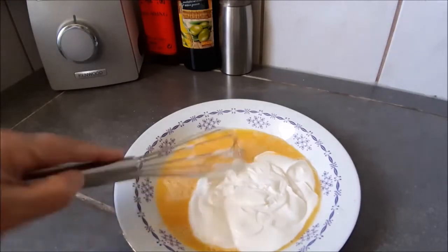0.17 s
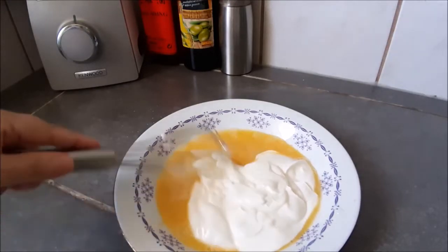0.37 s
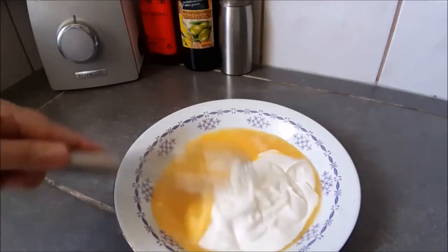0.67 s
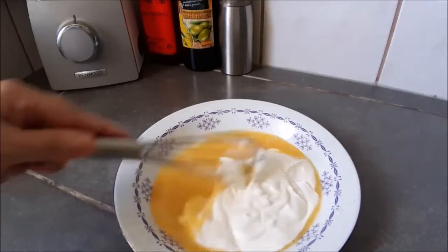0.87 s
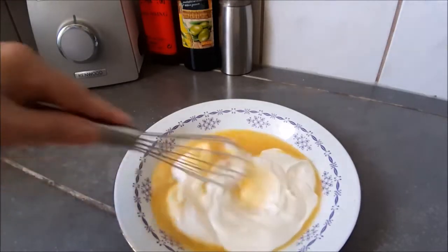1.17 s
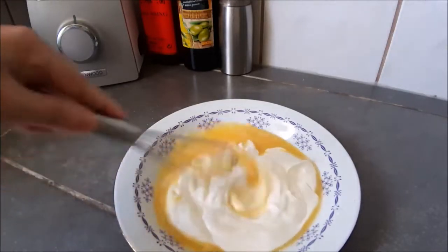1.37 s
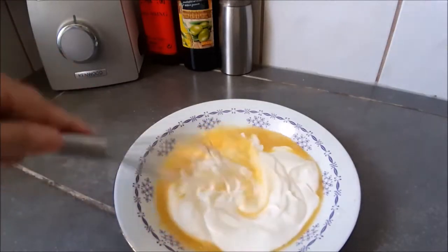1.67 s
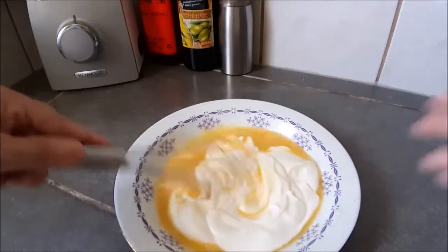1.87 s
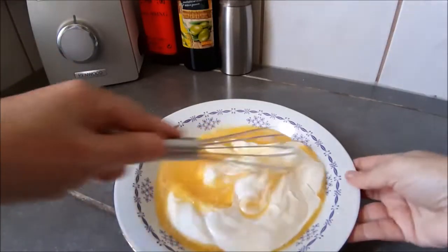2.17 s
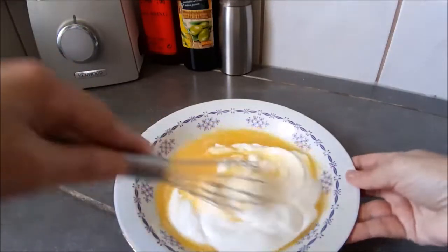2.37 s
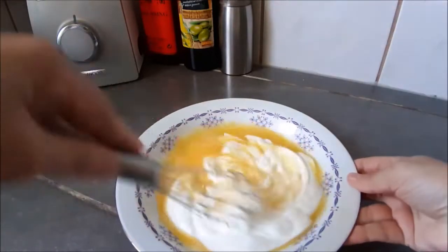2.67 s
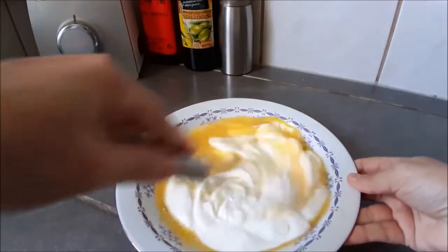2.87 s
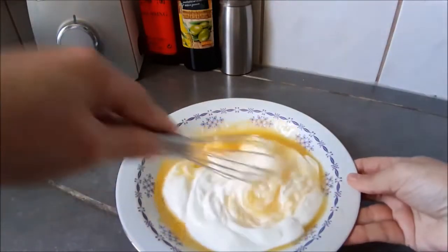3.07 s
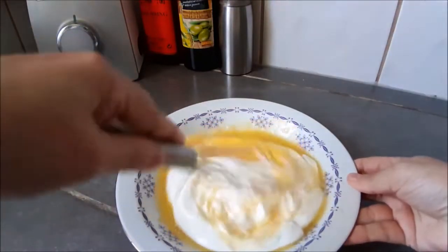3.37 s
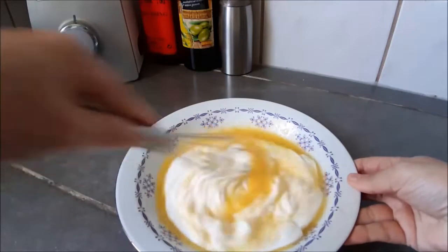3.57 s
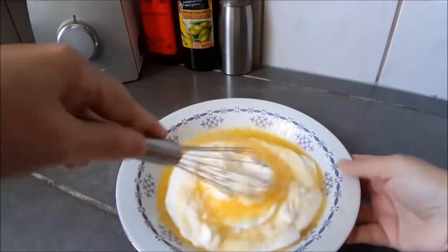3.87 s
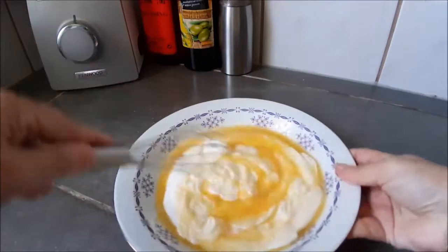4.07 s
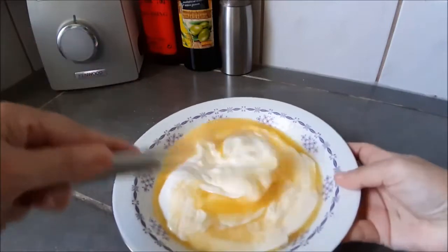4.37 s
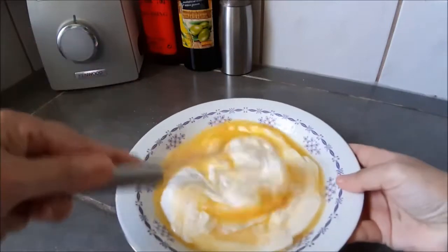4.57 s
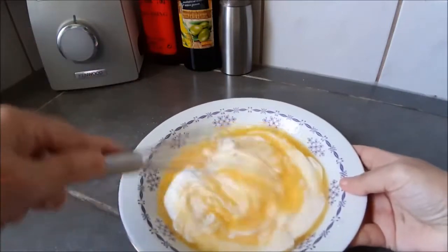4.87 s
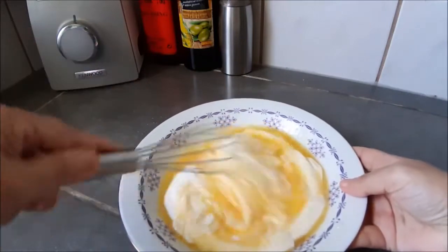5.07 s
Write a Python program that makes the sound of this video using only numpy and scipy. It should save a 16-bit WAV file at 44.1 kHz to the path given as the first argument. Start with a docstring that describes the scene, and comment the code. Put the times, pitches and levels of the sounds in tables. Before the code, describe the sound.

A wire whisk beats egg and yogurt in a ceramic dish, ringing clinks and light scrapes growing into harder, wetter strokes at the end.

```python
"""A steel balloon whisk beats egg and yogurt in a ceramic soup dish on a kitchen counter.
It opens in a quiet kitchen with faint touches; from 0.4 s hard blows ring the dish, each a noise burst
through its modes, then a drag. Wires scrape from 1.3 s and sing from 2.4 to 4 s, as filtered noise patches,
while the dish rubs on the counter and briefly hums. Wet slaps and the hardest blows crowd the last second.
A decaying noise echo of the small tiled room and a steady hush surround it all."""
import sys
import numpy as np
from scipy import signal
from scipy.fft import rfft, irfft, next_fast_len
from scipy.io import wavfile
from scipy.ndimage import uniform_filter1d, map_coordinates

SR = 44100
rng = np.random.default_rng(int(sys.argv[2]) if len(sys.argv) > 2 else 0)


def file_out(sig):
    """Save sig as 16-bit WAV at sys.argv[1]."""
    # one column per channel
    cols = np.atleast_2d(sig).T
    # limit, then scale
    lim = np.clip(cols, -1, 1)
    pcm = np.round(lim * 32767).astype(np.int16)
    wavfile.write(sys.argv[1], SR, pcm)


N = 230596


def amp(db):
    """Decibels to gain."""
    return 10 ** (np.asarray(db) / 20)


def unit(x):
    """Scale to rms 1."""
    return x / np.sqrt(np.mean(x ** 2) + 1e-20)


def along(points, hz):
    """Read a curve of (Hz, value) points on a log frequency axis."""
    f, v = np.transpose(points)
    return np.interp(np.log(hz + 1), np.log(f + 1), v)


def curves(tables):
    """A softened gate that is open inside the tables, then one curve for each column after the time."""
    t = np.arange(N) / SR
    s, *cols = np.vstack(tables).T
    gate = sum((t >= rows[0][0]) & (t <= rows[-1][0]) for rows in tables)
    return [uniform_filter1d(np.minimum(gate, 1.), size=600)] + [np.interp(t, s, c) for c in cols]


def wobble(rate):
    """A smooth random curve with `rate` knots a second."""
    knots = rng.standard_normal(int(N * rate / SR) + 4)
    return map_coordinates(knots, [np.arange(N) * rate / SR])


def stepped(spread_db, hold, length):
    """Random gains, each held for `hold` samples."""
    return amp(spread_db * rng.standard_normal(length // hold + 1).repeat(hold)[:length])


def filtered(x, response):
    """Shape x by a complex response of frequency, padded against wrap-around."""
    n = x.shape[-1]
    m = next_fast_len(n + 4096)
    return irfft(rfft(x, m) * response(np.fft.rfftfreq(m, 1 / SR)), m)[..., :n]


def modes(table, gains=1, shift=0):
    """Causal resonances of alternating sign; gains may differ by mode and microphone, pitches may scatter."""
    centre, width, db = np.transpose(table)[:, :, None]
    centre = centre * (1 + shift * rng.standard_normal(centre.shape))
    sizes = gains * (-1.) ** np.arange(len(table))
    return lambda f: sizes @ (amp(db) * 1j * f * width / (centre * centre - f * f + 1j * f * width))


def rough(level_db):
    """Noise whose strength follows a jumpy level, as many small contacts."""
    return unit(amp(level_db) * rng.standard_normal(N))


# wire blows: start_s [s], level_db [dB], spot_hz favoured pitch [Hz], lift_db its lift [dB],
# higher_hz second favoured pitch [Hz], low_db low dish modes [dB], drag_db [dB], drag_s [s]
WHISK_BLOWS = [(0.173, -64.5, 2290, -4, 7600, -4, -0.5, .04), (0.261, -41.5, 1193, 2.5, 2035, 12, 2, 0.052),
               (0.2712, -39, 2100, 0, 4700, 2, -15, 0.11), (0.401, -47, 1436, 20, 2600, -18, -17, 0.063),
               (0.427, -28, 1400, 7, 5850, 6.5, -18.5, 0.072), (0.6149, -27, 1164, 9, 2120, 4, -17, 0.064),
               (0.789, -51, 1270, 14, 2160, 5, -4.5, 0.097), (0.8064, -23.5, 1186, 11, 2127, 5, -35, 0.043),
               (1.0898, -25.5, 900, 7, 2976, 0.5, -18.5, 0.082),
               (1.281, -41.5, 2197, 11, 1383, 4, -5.5, 0.06),
               (1.4291, -37.5, 1570, 11, 2660, -2, -31, 0.048),
               (1.505, -50.5, 1580, 14.5, 2230, -4, 5, 0.045),
               (1.5296, -43, 1630, 22, 2620, 7.5, -14, 0.019),
               (1.72, -28, 2330, 2.5, 4580, -3.5, -12.5, 0.034),
               (1.873, -40, 1850, 5, 4260, -4, -23, 0.029),
               (1.8897, -35.5, 1174, 19, 1740, -16, -13, 0.095),
               (1.9026, -31.5, 792, 14, 1880, 13, -38, 0.22),
               (1.9903, -42.5, 2800, 10, 4470, -21, -31, 0.19),
               (2.1269, -30, 2690, 15.5, 2160, 4, -18, 0.06), (2.197, -44, 1800, 5, 2490, 8, -20.5, 0.083),
               (2.3443, -45.5, 800, 28, 2860, -13.5, -9, 0.046),
               (2.486, -48.5, 1500, 13, 2160, -4, -33, 0.017), (2.698, -53.5, 1410, 13, 2600, 8, -11, 0.04),
               (2.861, -60, 1324, 5, 3040, -4, -35, .03), (2.897, -41, 1554, 19, 2637, -9, 2.5, 0.016),
               (3.005, -44.5, 1580, -11, 4230, -32, -42, 0.035),
               (3.2396, -27, 1602, 29, 4100, -5.5, -33, 0.016),
               (3.314, -40, 1430, 7, 3840, -20, -11.5, 0.03), (3.3435, -44, 1325, 7, 3900, 0.5, -2, 0.023),
               (3.533, -46, 1534, 25.5, 4050, 6.5, -11, 0.073),
               (3.564, -45.5, 1560, 25.5, 2450, -11, -26.5, 0.023),
               (3.5809, -39.5, 1424, 9, 4150, -4, -10.5, 0.039),
               (3.723, -44.5, 1590, 4, 2390, -11, -9, 0.036), (3.8, -43, 1510, 20.5, 2600, 9.5, -24, 0.062),
               (3.829, -46.5, 1345, 11, 2580, 4, -7, .02), (3.849, -45, 824, 14.5, 4060, 4, 3.5, 0.014),
               (3.928, -44.5, 1270, -2, 2320, -10, -31, .02),
               (4.1206, -27.5, 787, 15.5, 4375, 6, -19.5, 0.051),
               (4.3244, -28.5, 2490, 19.5, 3220, 7.5, -19.5, 0.043),
               (4.414, -49, 1145, 0, 7800, -4, -18, 0.1), (4.4968, -48, 2340, -6, 6250, -23, -9.5, 0.045),
               (4.5263, -19.5, 2700, 4, 4600, 0, -23.5, 0.074),
               (4.7077, -38, 780, 2, 7640, 12.5, -3.5, 0.0074),
               (4.7358, -18.5, 850, 13.5, 3273, -2.5, -33, 0.076),
               (4.7788, -32, 1820, 5.5, 2800, -30, -33.5, 0.15),
               (4.9209, -28, 1750, 13.5, 2250, 6.5, -47, .046),
               (4.947, -25, 1792, 9.5, 1560, 7, -17.5, 0.073),
               (5.147, -27.5, 845, 18.5, 1810, 11.5, -55, 0.018),
               (5.1686, -25, 1600, 16.5, 2560, 10, -18, 0.059)]
# ceramic dish resonances: centre_hz [Hz], width_hz [Hz], level_db [dB]
DISH_MODES = [(800.5, 50, -9), (901, 35, -1.5), (1183, 32, -1.5), (1389, 34, 1), (1592, 33.4, -2.5),
              (1774, 64, 2.5), (2139, 41.5, 0.5), (2305, 51, 1.5), (2637, 120, -3.5), (3190, 67, 3),
              (4076, 340, -7.5), (4603, 53, 2), (5037, 300, -9), (5960, 140, -2.5), (7676, 335, -12.5)]
# counter resonances: centre_hz [Hz], width_hz [Hz], level_db [dB]
COUNTER_MODES = [(258.6, 23, -3), (327.5, 14.6, 3.5), (395, 47, -4), (451, 56, -5), (755, 123, 1.5),
                 (1200, 197, -2.5), (1900, 940, -14.5)]
# the cupboard under the counter: centre_hz [Hz], width_hz [Hz], level_db [dB]
CUPBOARD_MODES = [(108, 28.5, -2.5), (143, 6.9, -5)]
# colour of the wires' own click: freq_hz [Hz], level_db [dB]
WIRE_CLICK = [(290, -20), (500, -20), (885, -12.5), (1430, -8), (3210, 0), (3710, -5.5), (12300, -12.5),
              (15600, -12.5), (16500, -61)]
# modes that a blow near the rim wakes or misses: centre_hz [Hz], lift_db [dB]
RIM_LIFTS = [(790, -6), (1650, -7), (2620, -5), (3150, 5), (4100, -9), (5100, 5)]
RIM_HZ = 1150, 1240  # a blow that favours a pitch in this range fell near the rim
DISH_DB, WIRE_DB, KNOCK_DB = 1, -3, -5  # shares of dish, wires and counter in a blow of MIDDLE_DB
MIDDLE_DB, TREBLE_DB = -25.5, 4.5  # a middling blow's level and its treble lift
BRIGHTER, KNOCK_GROWS, CLEAN_GROWS = 0.12, 0.14, 0.13  # dB of treble, knock, first strike per dB of strength
HIGHER_DB, BESIDE = 8, 0.06  # lift of the higher pitch; spill of lifts to neighbours (log-frequency width)
DAMPED, DRAG_SHARE = 1.13, 0.97  # widening of a loaded mode; share of the lifts left in the drag
ECHO_SHARE = 0.4  # share of the lifts that the room does not hear: they belong to the near side of the dish


def spill(ratio):
    """A lift is full at its own pitch and fades at neighbouring ones."""
    return np.exp(-(np.log(ratio) / BESIDE) ** 2)


def loaded_dish(pitches_hz):
    """The load of the mixture pulls the nearest mode to each favoured pitch and widens it."""
    loaded = np.array(DISH_MODES, float)
    for hz in pitches_hz:
        k = np.argmin(abs(np.log(loaded[:, 0] / hz)))
        loaded[k, :2] = hz, DISH_MODES[k][1] * DAMPED
    return loaded


def strike_force(stronger_db, drag_db, drag_s):
    """Wires land within a few ms, then drag: noise of shape (landing or drag, microphone, sample)."""
    t = np.arange(SR // 7) / SR
    landing = (1 - np.exp(-t / 0.0012)) * np.exp(-(t / 0.0076) ** 1.35)
    dragging = 1 / (1 + np.exp(np.clip((t - drag_s) / 0.01, -30, 30)))
    envelopes = np.array([landing, amp(drag_db) * dragging])[:, None]
    force = envelopes * rng.standard_normal((2, len(t))) * stepped(1.25, 40, len(t))
    force[0, :, 25] += 3 * amp(CLEAN_GROWS * stronger_db)  # the first wire strikes cleanly
    # the two sides of the dish face different microphones
    force[:, 1] = 0.058 * force[:, 0] + 1.065 * force[:, 1]
    return force


def blow(db, spot_hz, lift_db, higher_hz, low_db, drag_db, drag_s):
    """One strike rings dish, wires and counter; the struck spot favours some dish modes."""
    stronger_db = db - MIDDLE_DB
    force = strike_force(stronger_db, drag_db, drag_s)
    loaded = loaded_dish((spot_hz, higher_hz))
    centre = loaded[:, 0]
    favour_db = lift_db * spill(centre / spot_hz) + HIGHER_DB * spill(centre / higher_hz)
    near_rim = RIM_HZ[0] < spot_hz < RIM_HZ[1]
    treble_db = TREBLE_DB + BRIGHTER * stronger_db

    def tilt(f):
        rim_db = near_rim * sum(lift * spill((f + 1) / hz) for hz, lift in RIM_LIFTS)
        slope_db = np.interp(np.log(f + 1), np.log([1160, 1470, 4400, 6550]), [low_db, 0, 0, treble_db])
        return amp(rim_db + slope_db)

    ring = 0
    for part, share in zip(force, (1, DRAG_SHARE)):
        chance_db = 1.5 * rng.standard_normal(len(centre)) + 2 * rng.standard_normal((2, len(centre)))
        dish = modes(loaded, amp(share * favour_db + chance_db), shift=0.004)
        ring = ring + filtered(
            part, lambda f: tilt(f) * (amp(DISH_DB) * dish(f) + amp(along(WIRE_CLICK, f) + WIRE_DB)))
    below = COUNTER_MODES + CUPBOARD_MODES
    knock = filtered(force[:, 0].sum(axis=0), modes(below, amp(2.5 * rng.standard_normal(len(below)))))
    return amp(db) * (ring + amp(KNOCK_DB + KNOCK_GROWS * stronger_db) * knock)


def blows():
    """Place every blow close by, and its less coloured echo in the room."""
    near, far = np.zeros((2, N + SR)), np.zeros((2, N + SR))
    for start_s, *settings in WHISK_BLOWS:
        _, spot_hz, lift_db, higher_hz, *_ = settings
        sound = blow(*settings)
        start = round(start_s * SR)
        near[:, start:][:, :sound.shape[1]] += sound

        def unlift(f):
            lifts_db = lift_db * spill((f + 1) / spot_hz) + HIGHER_DB * spill((f + 1) / higher_hz)
            return amp(-ECHO_SHARE * lifts_db)

        echo = kitchen(filtered(sound, unlift))
        far[:, start:][:, :echo.shape[1]] += echo
    return near[:, :N], far[:, :N]


# wires sliding round the glaze, one list per passage: time_s [s], rustle_db [dB],
# low_hz pitch of the singing mode [Hz], low_db its level [dB], high_db level of the mode above [dB]
WIRE_SLIDES = [
    [(1.29, -60, 1350, -91, -78), (1.368, -67, 1600, -69, -86), (1.458, -62, 1634, -67, -76),
     (1.564, -66, 1670, -65, -63), (1.628, -85, 1630, -76.5, -100), (1.7, -57.5, 1290, -76, -90)],
    [(2.4, -64.5, 1540, -80, -77), (2.592, -70, 1473, -65, -57), (2.676, -66, 1590, -60, -96),
     (2.758, -64, 1400, -74, -80), (2.84, -60, 1330, -54.5, -65.5), (2.898, -62, 1590, -64, -69),
     (2.952, -62.5, 1540, -55, -85), (3.016, -62, 1610, -61, -78), (3.156, -59.5, 1286, -59, -57),
     (3.222, -58, 1633, -58, -83), (3.268, -73, 1593, -48, -92), (3.444, -55.5, 1292, -58.5, -77),
     (3.548, -72, 1564, -67, -69), (3.588, -81, 1470, -62, -56), (3.688, -52.5, 1230, -64.5, -67),
     (3.75, -55, 1530, -56, -65), (3.782, -78, 1530, -75.5, -76), (3.868, -72, 1446, -56, -55.5),
     (3.89, -61, 1470, -71, -77), (3.932, -72.5, 1264, -58.5, -82), (4.0, -99, 1320, -97, -100)],
]
# colour of the sliding hiss: freq_hz [Hz], level_db [dB]
SLIDING_HISS = [(400, -77), (482, -10.5), (1170, -11.5), (1570, -2.5), (2020, -7), (2430, -3),
                (11000, -13.5), (15300, -19), (16500, -39)]
# path of the mode above: time_s [s], pitch_hz [Hz]
UPPER_PATH = [(1.45, 2550), (2.42, 2274), (2.62, 2140), (2.8, 2554), (4.0, 2420)]
# modes woken at the low and at the high spot: centre_hz [Hz], width_hz [Hz], level_db [dB]
SPOT_MODES = [
    [(2257, 66, 3.5), (3426, 55, 9.5), (4630, 56, 2.5), (6060, 53, 0)],
    [(2670, 43, 2), (3370, 91, -3), (4170, 75, 5), (5760, 110, 1)],
]
RUB_S, UPPER_SPREAD = 0.04, 0.025  # spacing of the spots (s); relative pitch scatter of the mode above
SPOT_HZ, TOP_HZ = 1460, 16700  # singing pitch that divides the two spots; upper band limit


def rubs():
    """Stick-slip: spot after spot the wires rustle through the dish and make two loaded modes sing."""
    gate, rustle_db, low_hz, low_db, high_db = curves(WIRE_SLIDES)
    step = round(RUB_S * SR)
    out = np.zeros((3, 2, N + SR))  # rustle, low song, high song
    fade = np.sin(np.pi * np.arange(2 * step) / (2 * step))
    upper_dish = DISH_MODES[7:]
    for i in range(0, N - step, step):
        if gate[i:i + 2 * step].max() < .01:
            continue
        # many short slips
        slips = stepped(3.5, 60, 2 * step) * rng.standard_normal((2, 2 * step))
        dish = modes(upper_dish, amp(-3 + 6 * rng.standard_normal(len(upper_dish))), shift=.04)
        pitch_hz = low_hz[i + step]
        woken = SPOT_MODES[int(pitch_hz > SPOT_HZ)]
        fleck = modes(woken, amp(5 + 4 * rng.standard_normal(len(woken))), shift=.015)
        upper_hz = np.interp((i + step) / SR, *np.transpose(UPPER_PATH))
        upper_hz *= 1 + UPPER_SPREAD * rng.standard_normal()
        patches_db = 3 * rng.standard_normal(24)  # each spot has its own uneven colour
        colour = lambda f: amp(np.interp(f, np.linspace(0, TOP_HZ, len(patches_db)), patches_db))
        surface = lambda f: colour(f) * (amp(along(SLIDING_HISS, f) + 6.0) + dish(f)) + fleck(f)
        rustle = unit(filtered(slips, surface))
        # a mode sings at some spots and breaks off at others
        sing_db = -7 * abs(rng.standard_normal((2, 1, 1))) + 3
        # a pitch mirrored about the dividing one sounds faintly along
        low_pair = modes([(pitch_hz, 90, 0), (2 * SPOT_HZ - pitch_hz, 110, -5)], shift=.015)
        high_mode = modes([(upper_hz, 130, 0)])
        low = unit(filtered(slips, lambda f: low_pair(f) ** 2))
        high = unit(filtered(slips, lambda f: high_mode(f) ** 2))
        out[..., i:i + 2 * step] += fade * np.array([rustle, *(amp(sing_db) * [low, high])])
    rustle, low, high = out[..., :N]
    flutter = amp(3.5 * wobble(35) + 3 * wobble(140))
    low_song = amp(low_db + 0.93 * wobble(45)) * low
    high_song = amp(high_db + 1.3 * wobble(25.1)) * high
    return gate * (amp(rustle_db) * flutter * rustle + low_song + high_song)


# the dish shifting on the counter: peak_s [s], rub_db [dB], rise_s and fall_s for 20 dB [s, at least 0.01],
# upper_db level of the upper part [dB]
DISH_SHIFTS = [(0.202, -76, 0.2, 0.5, -28), (1.928, -61, 0.038, -0.325, 3.5),
               (2.278, -65.5, 0.11, 0.06, -3.5), (2.644, -60.5, 0.17, 0.19, 1),
               (3.265, -72, 0.17, 0.94, 0.5), (2.855, -64, 0.034, 0.09, -2),
               (4.058, -58, 0.013, -0.06, -9.5), (4.293, -53.5, 0.17, 0.0353, 3.5),
               (4.661, -57, 0.16, 0.1, 1)]
# the cupboard shaken through the counter: time_s [s], level_db [dB]
CUPBOARD_SHAKE = [
    [(0.0, -85), (0.12, -79), (0.185, -56.5), (0.26, -74.5), (0.42, -74.5), (1.66, -89.5), (1.73, -70.5),
     (1.8, -82), (3.7, -78.5), (4.74, -70.5), (4.89, -81), (5.01, -59), (5.07, -72), (5.23, -99)],
]
ROUND = 1.17  # how round the top of a swell is


def rocking():
    """The foot of the dish judders on the counter and shakes the cupboard below."""
    t = np.arange(N) / SR
    lower, upper = np.zeros(N), np.zeros(N)
    for peak_s, db, rise_s, fall_s, upper_db in DISH_SHIFTS:
        distance = np.where(t < peak_s, (peak_s - t) / max(rise_s, .01), (t - peak_s) / max(fall_s, .01))
        swell_db = -20 * distance ** ROUND
        lower += amp(db + swell_db)
        upper += amp(db + upper_db + swell_db)
    judder = rough(2.8 * wobble(35) + 1.8 * wobble(110))
    low_rub = lower * unit(filtered(judder, modes(COUNTER_MODES[:4])))
    high_rub = upper * unit(filtered(judder, modes(COUNTER_MODES[4:])))
    boom = filtered(rough(4.7 * wobble(45)), modes(CUPBOARD_MODES))
    return low_rub + high_rub + amp(curves(CUPBOARD_SHAKE)[1]) * unit(boom)


# the mixture slaps and the dish bumps: start_s [s], level_db [dB], pitch_hz [Hz]
WET_SLAPS = [(0.172, -64, 334), (4.066, -40.5, 775), (4.227, -39, 710), (4.274, -39.5, 350),
             (4.312, -32, 373), (4.633, -31.5, 284), (4.661, -33.5, 330), (4.683, -34, 382),
             (4.992, -38.5, 306)]


def slaps():
    """Soft wet pushes: a few cycles that die at once, with a dull puff."""
    out, t = np.zeros(N + SR), np.arange(SR // 20) / SR
    envelope = (1 - np.exp(-t / 0.0022)) * np.exp(-t / 0.0034)
    for start_s, db, hz in WET_SLAPS:
        puff = unit(filtered(rng.standard_normal(len(t)), modes(COUNTER_MODES[4:])))
        wave = np.sin(2 * np.pi * hz * t) + 0.55 * puff
        out[round(start_s * SR):][:len(t)] += amp(db) * envelope * wave
    return out[:N]


# hums of the swaying dish: start_s [s], level_db [dB], hold_s [s]
DISH_HUMS = [(1.907, -57, 0.028), (2.254, -65.5, 0.041), (3.24, -52.5, 0.026), (3.533, -58.5, 0.036)]


def hums():
    """The swaying dish hums on one low counter mode: a quick swell, a hold and a decay, wavering a little."""
    t = np.arange(N) / SR
    pitch_hz = COUNTER_MODES[1][0] * (1 + 0.0199 * wobble(30.04))
    tone = np.sin(2 * np.pi * np.cumsum(pitch_hz) / SR) * amp(0.99 * wobble(40))
    swell = np.zeros(N)
    for start_s, db, hold_s in DISH_HUMS:
        rise = np.clip((t - start_s) / 0.0072, 0, 1)
        swell += amp(db) * rise * np.exp(-np.maximum(t - start_s - hold_s, 0) / 0.015)
    return swell * tone


# decay of the small tiled room: freq_hz [Hz], t60_s [s]
ROOM_DECAY = [(100, 0.13), (300, 0.45), (800, 0.27), (2000, 0.32), (12000, 0.29)]


def kitchen(x):
    """A fresh diffuse answer, 200 samples late; each frequency dies at its own speed."""
    hz, t, z = signal.stft(rng.standard_normal((2, SR // 4)), SR, nperseg=256)
    decay = amp(-60 * t / along(ROOM_DECAY, hz)[:, None])
    tail = signal.istft(z * decay, SR, nperseg=256)[1]
    late = np.pad(np.atleast_2d(x), ((0, 0), (200, 0)))
    return signal.fftconvolve(late, tail / np.linalg.norm(tail[0]), axes=1)


# colour of the quiet kitchen: freq_hz [Hz], level_db [dB]
QUIET_COLOUR = [(37, -32), (73, 1), (117, 2.5), (251, -12), (6000, -17), (7300, -15), (15200, -18),
                (16500, -50)]


def hush():
    """Steady coloured noise at -77 dB rms, its own at each microphone."""
    air = rng.standard_normal((2, N))
    return amp(-77) * unit(filtered(air, lambda f: amp(along(QUIET_COLOUR, f))))


def ports(pair, lag_s, apart):
    """Two microphones: the right one hears lag_s later; the bass is shared and the treble differs."""
    late = lambda f: np.exp(-2j * np.pi * f * np.array([[0], [lag_s]]))
    share = lambda f: np.clip(apart * f / (f + 700), 0, 1)
    own = filtered(pair, lambda f: late(f) * (1 + share(f)) / 2)
    other = filtered(pair[::-1], lambda f: late(f) * (1 - share(f)) / 2)
    return own + other


def scene():
    """Whisk and dish close by, their echo in the kitchen, and its quiet background."""
    near, far = blows()
    wires = rubs()
    dish = rocking() + slaps() + hums()
    room = amp(-9.0) * far + kitchen(amp(-5) * wires + amp(-2) * dish)[:, :N]
    close = ports(near + wires + dish, lag_s=.00009, apart=1.0)
    return close + ports(room, lag_s=0, apart=2.1) + hush()


def record(dry):
    """Keep nothing above the band limit."""
    return filtered(dry, lambda hz: hz < TOP_HZ)


dry = scene()
out = record(dry)
file_out(out)
```